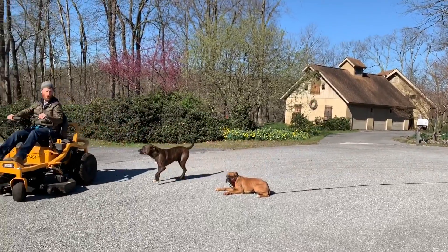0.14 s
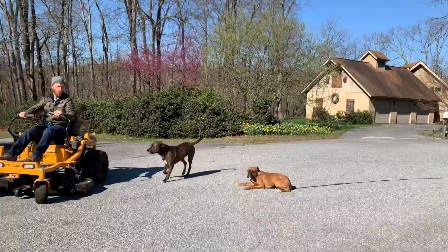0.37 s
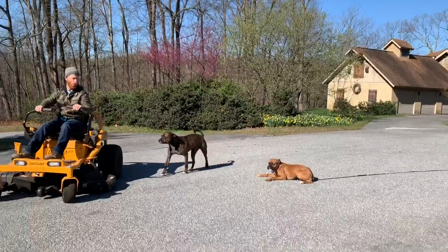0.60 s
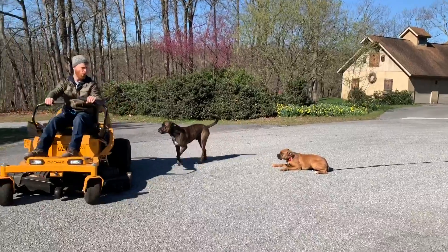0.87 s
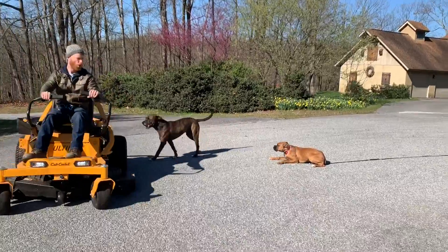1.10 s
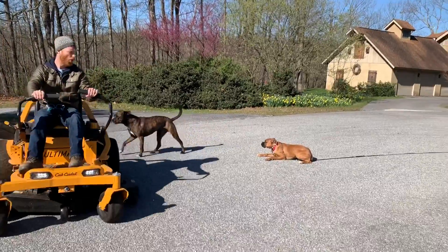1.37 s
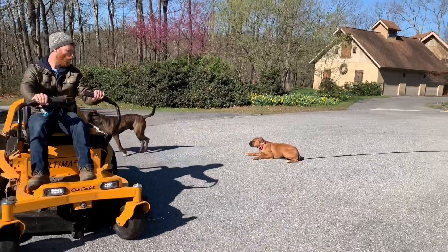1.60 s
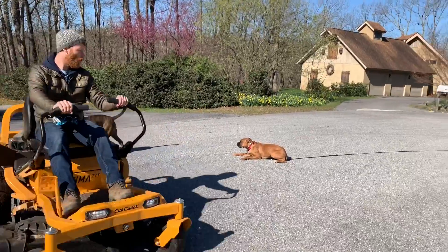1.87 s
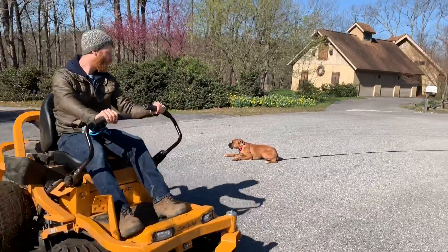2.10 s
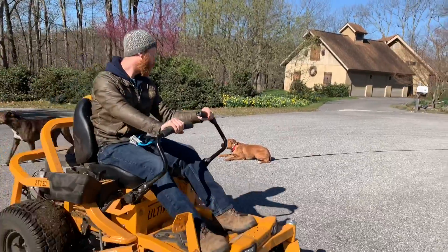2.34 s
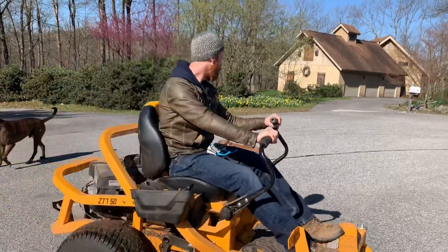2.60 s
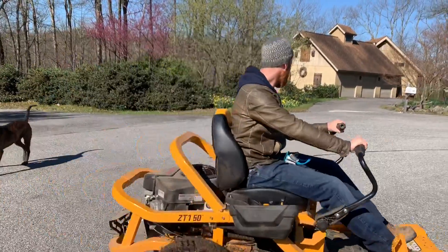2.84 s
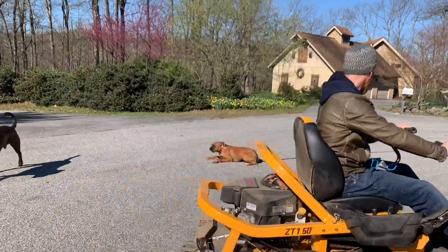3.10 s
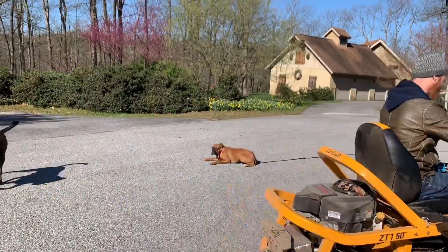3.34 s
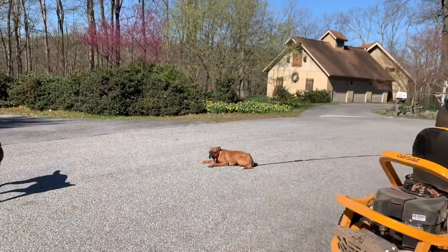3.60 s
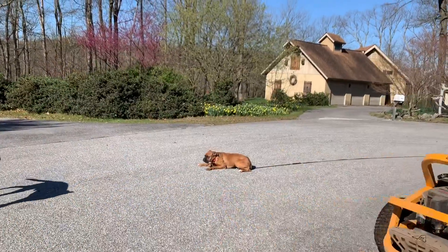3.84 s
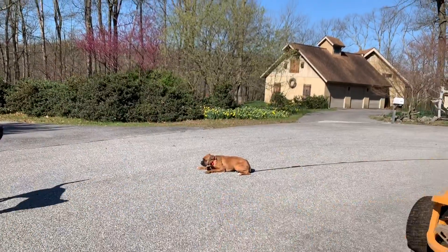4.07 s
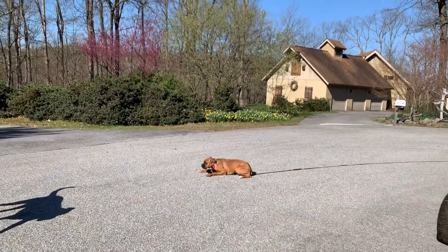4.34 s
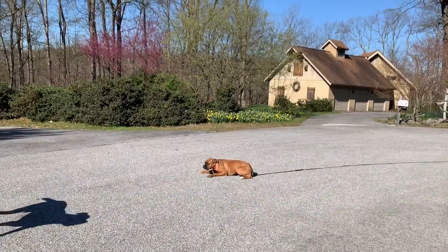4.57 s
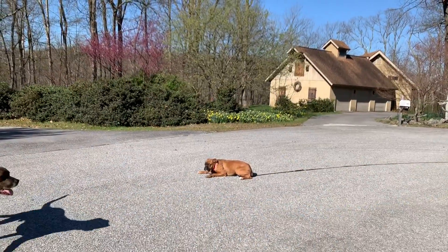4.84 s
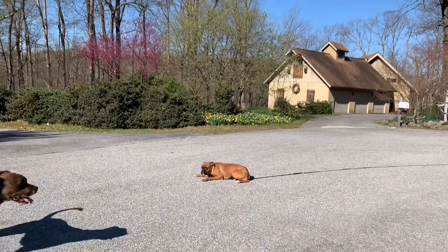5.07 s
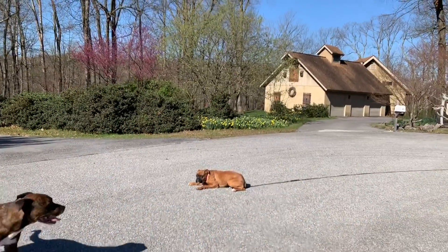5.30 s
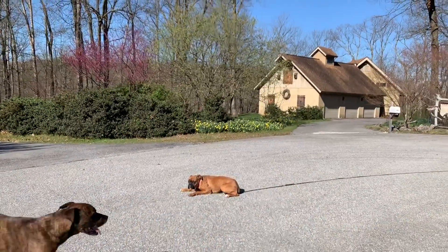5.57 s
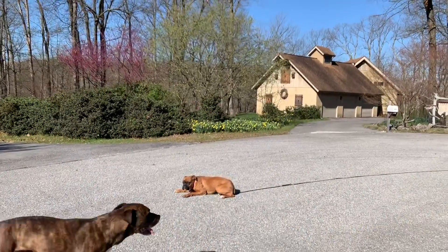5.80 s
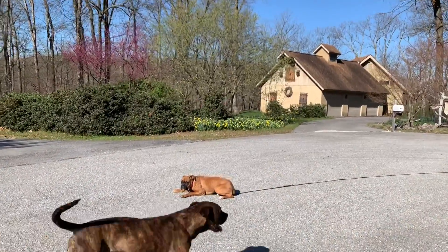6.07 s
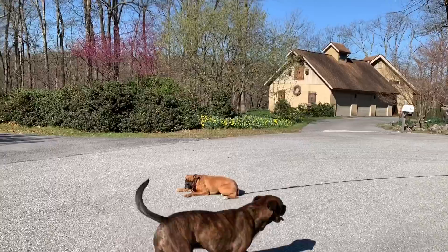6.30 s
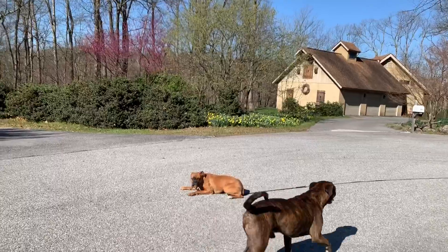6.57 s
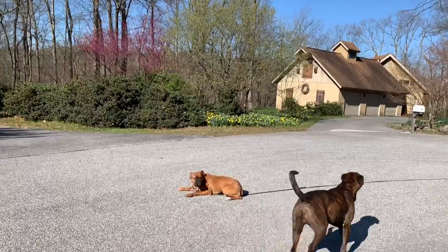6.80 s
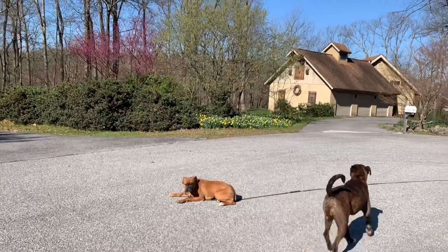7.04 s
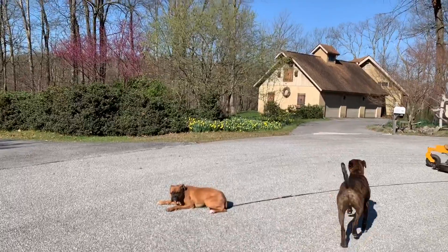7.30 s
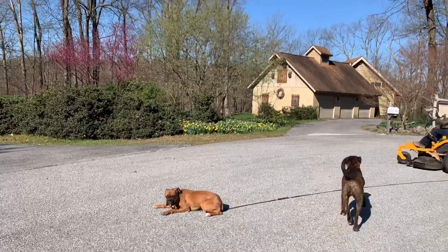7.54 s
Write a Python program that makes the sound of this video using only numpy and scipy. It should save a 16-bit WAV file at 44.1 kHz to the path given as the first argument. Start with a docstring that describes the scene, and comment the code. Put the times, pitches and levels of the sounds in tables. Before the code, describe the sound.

Steady rough mower engine drone with whine and hiss passes close across asphalt left to right, recedes, then jumps to faster revs in light wind.

```python
"""Riding mower passing by

On asphalt, a riding mower with a V-twin engine passes from left to right, two metres off at the closest.
About five metres off, its engine revs up. Engine orders add up to two uneven exhaust pulses a cycle, the throb.
Wavering sines make the pump whine; shaped noise bands make the casing, fan and tyre roar and the hiss.
Low noise is a light wind buffeting the two microphones of a hand-held phone."""
import sys
import numpy as np
from scipy import signal
from scipy.fft import rfft, irfft, next_fast_len
from scipy.io import wavfile

SR = 44100
rng = np.random.default_rng(int(sys.argv[2]) if len(sys.argv) > 2 else 0)


def ratio_of_db(decibels):
    """Turn decibels (scalar or array-like) into linear amplitude factors; 0 dB maps to 1."""
    return 10 ** (np.asarray(decibels, float) / 20)


def to_wav(sig):
    """Store sig (one row per channel, or 1-D mono) as 16-bit WAV at the path in sys.argv[1].

    Samples outside -1..1 are clipped; the rate is SR.
    """
    pcm = np.clip(np.atleast_2d(sig), -1, 1) * 32767
    pcm = np.round(pcm).astype(np.int16)
    wavfile.write(sys.argv[1], SR, pcm.T)  # frames by channels


N = 338247
STEP = 64   # samples between control values


def rms_one(x):
    """Scale to unit power."""
    return x / np.sqrt(np.mean(x ** 2) + 1e-20)


def slow_time(rows):
    """Curve columns at control rate."""
    s, *columns = np.transpose(rows)
    return [np.interp(np.arange(0, N + STEP, STEP) / SR, s, c) for c in columns]


def full(control):
    """Control rate to sample rate."""
    return np.interp(np.arange(N) / STEP, np.arange(len(control)), control)


def at_hz(table, hz):
    """Table columns read on a log-frequency axis."""
    points, *columns = np.transpose(table)
    return [np.interp(np.log(hz), np.log(points), c) for c in columns]


def drift(rate_hz):
    """Slow chance at control rate, spread 1: white noise through two equal low-pass poles."""
    r = np.exp(-2 * np.pi * rate_hz * STEP / SR)
    count = len(range(0, N + STEP, STEP))
    settle = 2000
    slow = signal.lfilter([1], [1, -2 * r, r * r], rng.standard_normal(count + settle))
    return rms_one(slow[settle:])


def band(x, low_hz, high_hz):
    """Butterworth band-pass."""
    return signal.sosfilt(signal.butter(2, [low_hz, high_hz], "band", fs=SR, output="sos"), x)


def seen_from(levels_db, aspect):
    """Level of one line or band as the mower turns; past the last column it holds."""
    return np.interp(aspect, np.arange(len(levels_db)), levels_db)


# phone body at the two microphones: (frequency [Hz], left over right for a source ahead [dB],
#   more left over right for one on the right [dB], lag of left for a source on the left [rad],
#   on the right [rad], likeness of the two microphones for one on the left [0-1], on the right [0-1])
PHONE_BODY = [(60, -1.5, -0.5, 0.37, 0.19, 0.33, 0.88), (245, -4, -0.9, 0.26, 0.65, 1, 1),
              (397, 0, 1, 0.9, 1.52, 0.81, 1), (726, -3, -6.5, -1.57, 2.1, 0.77, 0.86),
              (1024, 1, -5, -1.1, 1.91, 0.85, 0.65), (1697, 2.5, -0.5, -1.94, 2.87, 0.48, 1),
              (1990, 0.5, -2.5, -2, 4.26, 0.69, 0.63), (2800, -0.3, 0.5, -2.5, 3.88, 1, 0.53),
              (3360, -2, -1.5, -3.5, 4.84, 0.58, 0.66), (4340, -.8, -1.5, -6.5, 6.86, 0.65, 0.99),
              (5080, -6, 1, -5, 8.44, 0.19, 0.99), (5570, 1, -8, -15, 9.7, 0.18, 0.41),
              (6000, 4, 5, -14.5, 10.9, 0.26, 0.63), (7500, -4.5, -6.5, -6.5, 11.9, 0.18, 0.49)]


def pan(hz, way):
    """The phone body shades the far microphone; half the difference goes to each side."""
    ahead_db, shade_db = at_hz(PHONE_BODY, hz)[:2]
    half_db = (ahead_db + shade_db * way) / 2
    return half_db, -half_db


# exhaust pulses: (place in the cycle [0-1], relative strength)
FIRINGS = [(.225, 1.0), (.85, .65)]
# engine orders, balance among them: (multiple of the cycle rate [rounded to whole when played],
#   front [dB], front quarter [dB], flank [dB], rear [dB], throttle opening [dB], far [dB])
ENGINE_ORDERS = [(2, -39, -33, -27, -37, -27, -33), (3, -47, -37, -39, -39, -51, -90),
                 (4, -46, -66, -46, -59, -55, -65), (5, -23, -20, -16.5, -20.5, -22, -25.5),
                 (6, -27, -25.5, -25.5, -26.5, -27, -31.5), (7, -34, -26.5, -26.5, -29, -32, -35.5),
                 (8, -21.5, -18, -20.5, -25.5, -25, -29), (9, -31.5, -27.5, -33, -33, -39, -39.5),
                 (10, -31.5, -27, -27, -26.5, -32, -38.5), (11, -32.5, -29.5, -28.5, -30.5, -38, -40),
                 (12, -45, -45, -35, -45, -38, -45.5), (13, -53, -43, -56, -55, -27, -36),
                 (14, -48, -46, -40, -45, -29.5, -43), (15, -46, -47, -56, -53, -35.5, -47),
                 (16, -33.5, -40, -38, -45.5, -34, -38), (19, -43, -50, -39, -42, -35, -42.5),
                 (20, -61, -46, -51, -51, -46, -44.5), (21, -61, -54, -48, -46, -44, -38),
                 (22, -38.5, -40.5, -29, -40.5, -39, -33.5), (24, -55, -49, -30, -43, -42, -65),
                 (25, -45, -41, -32.5, -37.5, -37.5, -43), (26, -47, -61, -31, -43, -38, -43),
                 (27, -48, -59, -31, -45, -50, -57), (28, -70, -63, -54, -49, -53, -55),
                 (29, -58, -52, -30, -46, -49, -51), (30, -63, -48, -40, -58, -54, -48),
                 (31, -43, -51, -33, -54, -47, -77), (32, -46, -64, -38, -60, -42, -51),
                 (36, -70, -44, -40, -43, -37, -49), (42, -48, -46, -47, -32.5, -40.5, -48.5),
                 (44, -53, -63, -41, -58, -50, -62), (48, -46.5, -44, -36.5, -30, -61, -42.5),
                 (54, -52, -47, -37, -41, -48, -38.5), (59, -52, -50, -52, -41, -51, -50),
                 (60, -64, -58, -43, -40, -48, -52), (67.5, -46, -37, -37, -44, -57, -37),
                 (71.18, -51, -33.5, -34, -31, -30, -50)]
EXHAUST_TOP_ORDER = 11.5   # orders below this set the exhaust level
PULSE_TOP_ORDER = 17   # orders up to here shape the exhaust pulses
KNOCK_DELAY = 0.19   # cycles
SILENCER_SPREAD = 0.018   # radians per order squared


def engine_tones(cycle, aspect, exhaust_db, way, wobble_db, rough_db, slip):
    """Orders as sines; the low ones add up to two uneven pulses, the high ones wander in level and phase."""
    table = np.array(ENGINE_ORDERS, float)
    low = table[:, 0] < EXHAUST_TOP_ORDER
    low_sum_db = 10 * np.log10(np.sum(ratio_of_db(table[low, 1:]) ** 2, axis=0))
    base_db = exhaust_db - seen_from(low_sum_db, aspect)
    base_db = base_db + rough_db * drift(34)      # all orders flicker together
    out = np.zeros((2, N))
    for order, *levels_db in table:
        order = round(order)
        pair = sum(size * np.exp(-2j * np.pi * order * place) for place, size in FIRINGS)
        loose = order / EXHAUST_TOP_ORDER
        phase = np.angle(-pair) + slip * loose * drift(1.7)
        if order > PULSE_TOP_ORDER:
            # casing and intake knock a little after each exhaust pulse, less tightly
            phase = phase - 2 * np.pi * order * KNOCK_DELAY + rng.normal(0, 1.0)
        else:
            # the silencer lets the high orders out first
            phase = phase + SILENCER_SPREAD * (order - 5) ** 2
        level_db = base_db + seen_from(levels_db, aspect)
        level_db = level_db + wobble_db * min(loose, 2) * drift(5.3)
        tone = np.sqrt(2) * np.cos(2 * np.pi * order * cycle + full(phase))
        for side, side_db in zip(out, pan(order * 25, way)):
            side += tone * full(ratio_of_db(level_db + side_db))
    return out


# pump whine at one metre: (multiple of the stroke rate, front [dB], front quarter [dB], flank [dB],
#   rear [dB], throttle opening [dB], far [dB], nose turning back [dB])
WHINE_LINES = [(2, -30.5, -27.5, -48, -35, -28, -25, -27), (3, -45, -34, -45, -29, -30, -27, -26)]
STROKES_PER_CYCLE, WHINE_WAVER_DB = 11.76, 3.0


def drive_whine(speed_hz, aspect, spread_db, way):
    """Two wavering multiples of the stroke rate of the wheel-drive pump, geared to the engine."""
    stroke_hz = STROKES_PER_CYCLE * speed_hz + 0.5 * drift(2.84)
    strokes = np.cumsum(full(stroke_hz)) / SR
    out = np.zeros((2, N))
    for multiple, *levels_db in WHINE_LINES:
        multiple = round(multiple)
        level_db = spread_db + seen_from(levels_db, aspect) + WHINE_WAVER_DB * drift(0.8)
        tone = np.sqrt(2) * np.cos(2 * np.pi * multiple * strokes)
        for side, side_db in zip(out, pan(300 * multiple, way)):
            side += tone * full(ratio_of_db(level_db + side_db))
    return out


# mechanical noise, balance among bands: (frequency [Hz], front [dB per Hz], front quarter [dB per Hz],
#   flank [dB per Hz], rear [dB per Hz], throttle opening [dB per Hz], far [dB per Hz],
#   nose turning back [dB per Hz])
NOISE_COLOUR = [(60, -53, -50, -48, -47, -52, -53, -53), (143, -51, -63, -44, -35, -56, -69, -56),
                (310, -62, -59, -59, -56, -49.5, -64, -62), (416, -61, -56.5, -52, -60.5, -55, -65.5, -57),
                (590, -60, -54, -51, -58.5, -66, -59.5, -61),
                (940, -67.5, -59, -54, -52.5, -56.5, -65.5, -67),
                (1300, -65, -60, -55.5, -55, -56, -60.5, -60.5),
                (1570, -66, -55.5, -53.5, -51, -54, -59, -68),
                (2100, -65.5, -61, -56.5, -59.5, -58, -62.5, -70.5),
                (2840, -71.5, -63.5, -54, -64, -65, -70.5, -74),
                (3548, -74.5, -64.5, -53, -63, -61, -63, -60.5),
                (5040, -73, -68, -57, -67.5, -62.5, -65, -66.5),
                (7000, -76, -72, -59, -70.5, -65.5, -67.5, -69.5),
                (10400, -84, -78.5, -63.5, -72.5, -68, -72.5, -72.5),
                (15800, -88.5, -79, -68.5, -75, -71, -74.5, -76.5)]
ROAR_TOP_HZ, TREBLE_HZ = 2600, 7800


def machine_noise(cycle, aspect, roar_db, hiss_db, way, patchy_db, flicker_db, throb):
    """Quarter-octave bands of casing, fan and tyre noise: direct sound, scattered sound and the top octave."""
    edges = 195 * 2 ** (np.arange(27) / 4.06)
    centres = np.sqrt(edges[1:] * edges[:-1])
    levels_db = np.transpose(at_hz(NOISE_COLOUR, centres))
    power = ratio_of_db(levels_db) ** 2 * np.diff(edges)[:, None]
    roar = (centres > 300) & (centres < ROAR_TOP_HZ)
    hiss = centres > ROAR_TOP_HZ
    roar_db = roar_db - seen_from(10 * np.log10(power[roar].sum(axis=0)), aspect)
    hiss_db = hiss_db - seen_from(10 * np.log10(power[hiss].sum(axis=0)), aspect)
    white = rng.standard_normal((2, 3, N)) * np.sqrt(SR / 2)      # 0 dB per Hz
    direct, scattered, treble = np.zeros((2, N)), np.zeros((2, N)), np.zeros(N)
    together = drift(28)
    for k, hz in enumerate(centres):
        level_db = (hiss_db if hz > ROAR_TOP_HZ else roar_db) + seen_from(levels_db[k], aspect)
        unrest_db = patchy_db * together + flicker_db * drift(39)
        level_db = level_db + unrest_db * min(hz / 5000, 1.1)      # the treble flickers most
        if hz > TREBLE_HZ:
            treble += full(ratio_of_db(level_db)) * band(white[k % 2, 0], edges[k], edges[k + 1])
            continue
        shared, *own = band(white[k % 2], edges[k], edges[k + 1])
        on_left, on_right = np.clip(at_hz(PHONE_BODY, hz)[4:], 0, 1)
        # a source ahead is close by and wide, so least alike at the two microphones
        alike = np.interp(way, [-1, 0, 1], [on_left, on_left * on_right, on_right])
        for side, side_db in enumerate(pan(hz, way)):
            gain = ratio_of_db(level_db + side_db)
            direct[side] += full(np.sqrt(alike) * gain) * shared
            scattered[side] += full(np.sqrt(1 - alike) * gain) * own[side]
    # valves and pistons: a swell once a crank turn, and a weaker one three times a cycle
    turn_swell = throb * np.cos(4 * np.pi * cycle)
    third_swell = 0.048 * np.cos(6 * np.pi * (cycle - FIRINGS[0][0]))
    beat = 1 + turn_swell + third_swell
    return direct * beat, scattered * beat, treble * beat


# casing panels that ring along with the noise: (frequency [Hz], width [Hz], typical lift [0-2])
CASING_PANELS = [(950, 71, 0.29), (1398, 52, 0.79), (1670, 15, 0.12), (1930, 30, 0.39), (2486, 145, 0.59),
                 (9000, 210, 0.74)]


def panels(x):
    """Each panel resonates in a narrow band, by an amount that flickers at random."""
    out = x.copy()
    for hz, width_hz, lift in CASING_PANELS:
        r = np.exp(-np.pi * width_hz / SR)
        poles = [1, -2 * r * np.cos(2 * np.pi * hz / SR), r * r]
        rung = signal.lfilter([(1 - r * r) / 2, 0, (r * r - 1) / 2], poles, x)
        out += lift * full(ratio_of_db(3.9 * drift(9.1))) * rung
    return out


def path_round_phone(left, way, size):
    """The left microphone hears each pitch early or late, by the side that the sound comes from."""
    overlap = size - size // 4
    hz, s, frames = signal.stft(left, SR, nperseg=size, noverlap=overlap)
    from_left, from_right = at_hz(PHONE_BODY, np.maximum(hz, 1))[2:4]
    way = np.interp(s * SR / STEP, np.arange(len(way)), way)
    lag = np.outer(from_right, np.maximum(way, 0)) + np.outer(from_left, np.maximum(-way, 0))
    return signal.istft(frames * np.exp(-1j * lag), SR, nperseg=size, noverlap=overlap)[1][:N]


TREBLE_LAG_MS, TREBLE_IN_PHASE_HZ = 0.32, 10280


def lagged_treble(x):
    """The top octave reaches the left side a fixed moment late, wherever the source is."""
    size = next_fast_len(N + 64)
    hz = np.arange(size // 2 + 1) * SR / size
    turn = np.exp(-2j * np.pi * (hz - TREBLE_IN_PHASE_HZ) * TREBLE_LAG_MS / 1000)
    return np.array([irfft(rfft(x, size) * turn, size)[:N], x])


# wind on the microphones, swelling and easing before the random gusts: (time [s], level [dB])
WIND_LEVEL = [(0.0, -31), (0.15, -25.5), (0.45, -28), (0.75, -26), (1.8, -26.5), (2.0, -22), (2.35, -23.5),
              (2.8, -20.5), (4.0, -24), (4.7, -27), (5.1, -27), (5.85, -25.5), (6.25, -36), (6.6, -27.5),
              (7.1, -32), (7.67, -24)]
GUST_DB, GUST_RATE_HZ = 0.5, 2.1


def wind(shared_weight):
    """Low noise in gusts, partly its own at each microphone."""
    level_db = slow_time(WIND_LEVEL)[0] + GUST_DB * drift(GUST_RATE_HZ)
    shared, *own = band(band(rng.standard_normal((3, N)), 37, 178), 26, 290)
    return rms_one(shared_weight * shared + np.array(own)) * full(ratio_of_db(level_db))


# engine speed, near 24 and then raised with an overshoot: (time [s], four-stroke cycle rate [Hz])
ENGINE_SPEED = [(0.0, 24.0), (0.55, 23.83), (1.2, 24.25), (1.5, 23.93), (2.1, 24.19), (3.0, 23.92),
                (3.3, 24.04), (3.6, 23.94), (4.7, 23.72), (4.94, 23.99), (5.02, 24.72), (5.18, 27.22),
                (5.26, 27.97), (5.5, 27.29), (5.84, 27.04), (6.18, 27.45), (6.35, 27.41), (6.55, 27.01),
                (6.86, 26.65), (7.2, 26.99), (7.67, 27.22)]
# side of the mower that is heard: (time [s], aspect [0 front, 1 front quarter, 2 flank, 3 rear,
#   4 throttle opening, 5 far at higher speed, 6 nose turning back])
HEARD_SIDE = [(0, 0.01), (1.1, 0.15), (1.6, 0.74), (2.2, 1.43), (2.6, 1.9), (3.2, 2.3), (3.5, 2.78),
              (4.3, 3.27), (4.88, 3.6), (5.06, 4.0), (5.2, 4.04), (5.38, 5), (6.8, 4.84), (7.1, 5.75),
              (7.67, 5.77)]
# path of the mower past the phone: (time [s], distance [m], direction [-1 left to 1 right])
MOWER_PATH = [(0, 4.14, -0.95), (.4, 4.06, -0.84), (.75, 4.32, -.69), (1.2, 3.62, -0.98),
              (1.9, 2.58, -0.92), (2.3, 2.3, -0.81), (2.75, 1.96, -0.3), (3.15, 1.99, 0.099),
              (3.38, 2.6, 0.42), (3.56, 2.3, 0.72), (4.13, 3.58, .92), (4.5, 4.8, 0.92), (4.95, 5.58, 0.97),
              (5.5, 4.87, 0.95), (6.3, 5.8, 0.99), (6.88, 6.54, 0.99), (7.1, 5.64, 0.95), (7.67, 5.9, 0.83)]
# levels at one metre, each: (front [dB], front quarter [dB], flank [dB], rear [dB],
#   throttle opening [dB], far [dB], nose turning back [dB])
EXHAUST_LEVEL = [-6.2, -5.5, -8, -7.5, -4, -7.5, -8.5]
ROAR_LEVEL = [-18.5, -17.5, -14.5, -15, -12, -14.5, -17]
HISS_LEVEL = [-24, -23, -18.5, -20, -16.5, -20, -20]


def scene():
    """Tones and noise come from the mower's direction and thin out with distance; wind arises at the phone."""
    speed_hz, = slow_time(ENGINE_SPEED)
    cycle = np.cumsum(full(speed_hz)) / SR
    distance_m, way = slow_time(MOWER_PATH)
    aspect, = slow_time(HEARD_SIDE)
    spread_db = -20 * np.log10(distance_m)
    exhaust_db = spread_db + seen_from(EXHAUST_LEVEL, aspect)
    roar_db = spread_db + seen_from(ROAR_LEVEL, aspect)
    hiss_db = spread_db + seen_from(HISS_LEVEL, aspect)
    tones = engine_tones(cycle, aspect, exhaust_db, way, wobble_db=1.3, rough_db=1.0, slip=0.08)
    whine = drive_whine(speed_hz, aspect, spread_db, way)
    direct, scattered, treble = machine_noise(cycle, aspect, roar_db, hiss_db, way,
                                              patchy_db=0.5, flicker_db=1.0, throb=0.055)
    direct, treble = np.split(panels(np.vstack([direct, treble])), [2])
    direct = direct + tones + whine
    direct[0] = path_round_phone(direct[0], np.clip(way, -1, 1), size=1024)
    return direct + scattered + lagged_treble(treble[0]) + wind(shared_weight=1.17)


def low_pass(x):
    """Removes everything above the highest recorded frequency."""
    return signal.sosfilt(signal.butter(12, 15740, fs=SR, output="sos"), x)


def record(dry):
    """The phone cuts the deep bass and rounds the highest peaks."""
    cut = signal.sosfilt(signal.butter(4, 38, "high", fs=SR, output="sos"), dry)
    mix = 1.264 * np.tanh(cut / 1.337)
    return low_pass(mix)


dry = scene()
out = record(dry)
to_wav(out)
```